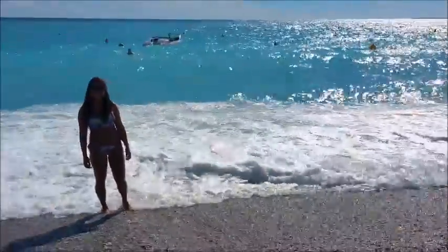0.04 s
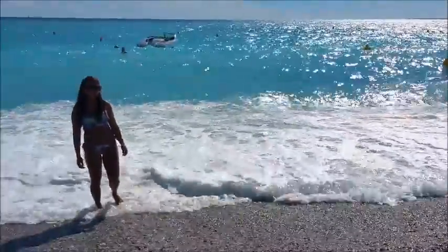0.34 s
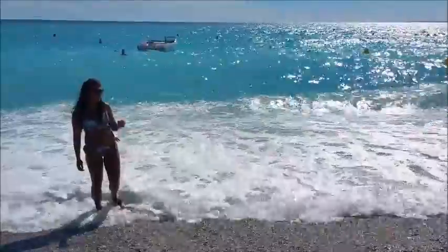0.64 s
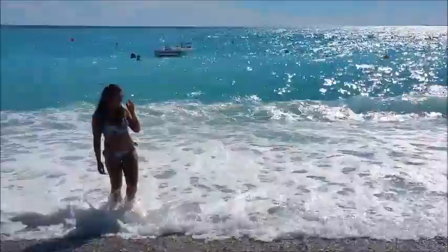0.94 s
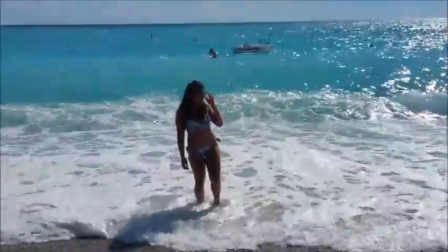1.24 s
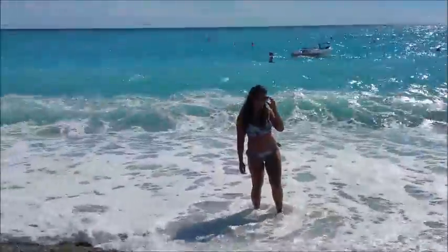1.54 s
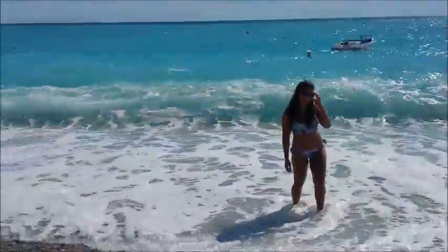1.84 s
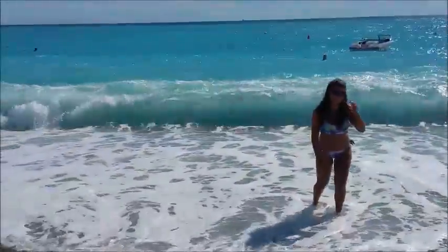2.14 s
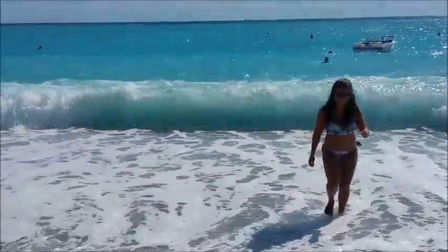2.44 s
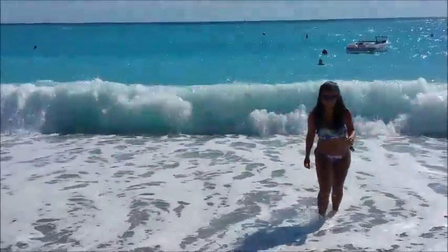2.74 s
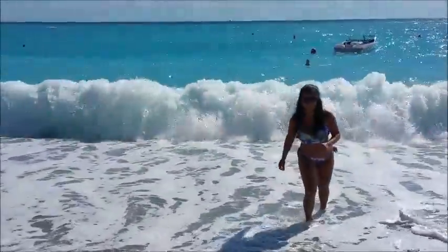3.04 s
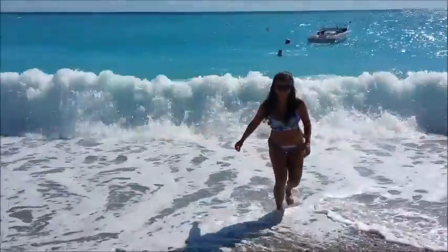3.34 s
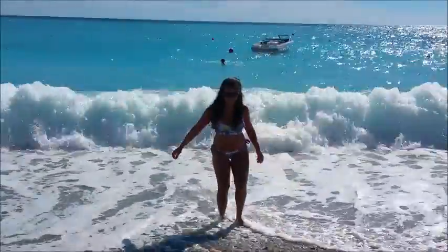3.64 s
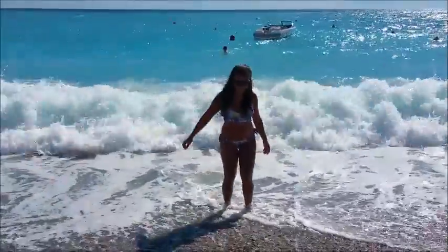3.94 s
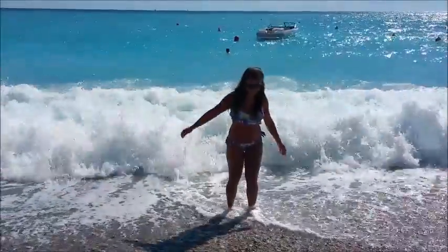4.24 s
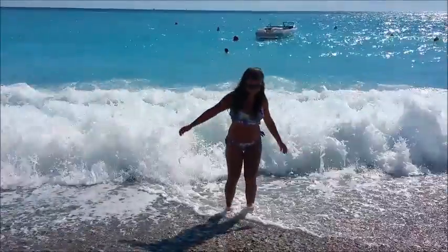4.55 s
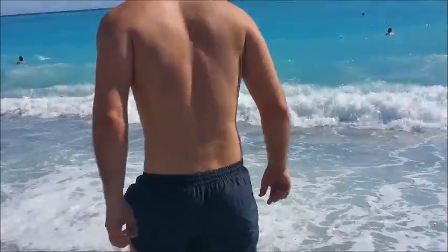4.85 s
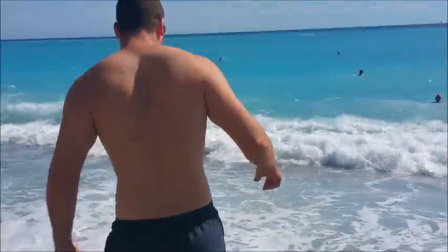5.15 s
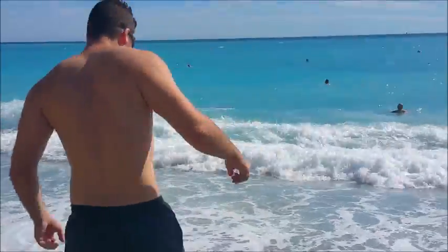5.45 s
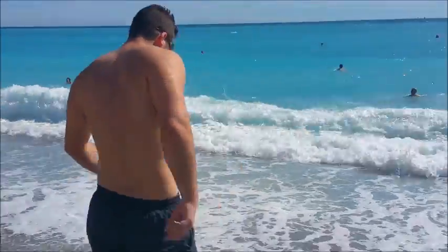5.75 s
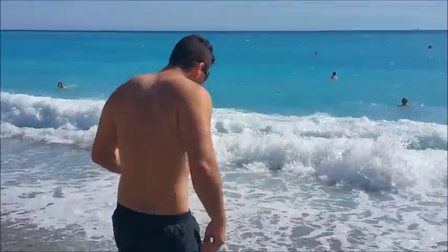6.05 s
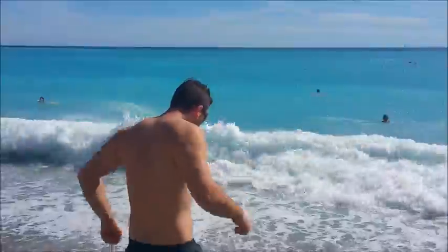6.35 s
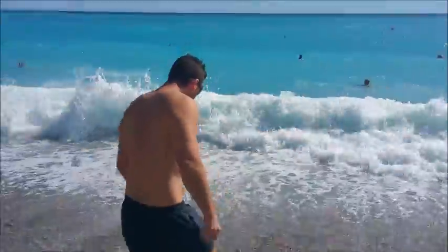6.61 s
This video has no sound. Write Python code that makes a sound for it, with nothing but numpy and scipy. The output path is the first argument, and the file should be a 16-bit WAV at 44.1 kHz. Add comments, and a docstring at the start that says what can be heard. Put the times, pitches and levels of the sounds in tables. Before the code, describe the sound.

Foam seethes up a pebble beach close by, over a light rumble of wind. During the first second, puffs of wind make a low, wavering hoot in the left side of the microphone. Two sharp taps strike the right side, at about 0.1 and 2.3 seconds. From around 2 seconds a breaker builds, crashing near 3 seconds and going on booming and churning under growing splash and fizzing spray. The sound stops dead at 4.6 seconds. After a short silence, more surf fades in at 5 seconds: water slaps the stones and drains through the shingle with a rising hiss, with a few faint, dry pebble clicks. A gust buffets the microphone between 5 and 6 seconds, harder on the right. Farther out, another wave booms at about 5.7 and 6.5 seconds, and the backwash carries on to the end, near 6.8 seconds.

```python
"""Foam washes up a pebble beach, close by, while a breaker builds and collapses behind it.
Wind hoots in the left microphone port and the right one is tapped twice. After a short silence
a second spot fades in: backwash hisses through the shingle while a gust buffets both ports.
The water is the ringing of near bubbles and stones over the noise of countless far ones;
the wind is heard as eddies at the microphone itself."""
import sys
import numpy as np
from scipy import signal
from scipy.fft import rfft, irfft, next_fast_len
from scipy.io import wavfile
from scipy.ndimage import uniform_filter1d, minimum_filter1d, map_coordinates

SR = 44100
rng = np.random.default_rng(int(sys.argv[2]) if len(sys.argv) > 2 else 0)


def store_pcm(level_fs):
    """Save levels as 16-bit WAV."""
    pcm = np.round(np.clip(level_fs, -1, 1) * 32767).astype(np.int16)
    wavfile.write(sys.argv[1], SR, np.atleast_2d(pcm).T)


N = 298998

TOP_HZ = 15870  # band limit
# colour of the ports at the first spot: f/Hz, left minus right/dB
FIRST_LEAN = [(100, 0), (380, 2.5), (560, -2), (800, 0.5), (1080, -2), (1400, 0), (2800, -4), (4100, 6),
              (5000, 5), (7300, 11), (8700, 5.5), (11000, 10), (15000, 17)]
# spectrum of wind on the microphone: f/Hz, level/dB
WIND_COLOUR = [(10, -24.5), (22, -21), (45, -7), (90, -1.5), (140, -3.5), (220, -12.5), (400, -21.5),
               (700, -18.5), (1500, -45), (4000, -80)]


def breaker():
    """Air pockets boom, bubbles churn and the crest crashes; white water splashes and fizzes on top."""
    # course of the wave: t/s, level/dB
    force = [(0.17, -37), (0.56, -38.5), (0.57, -38.5), (1.96, -34.5), (2.33, -30), (2.57, -30.5),
             (2.88, -24), (3.39, -26), (4.01, -22.5), (4.43, -23), (4.55, -23)]  # tumbling water
    fizz = [(0.03, -40), (1.01, -45), (1.72, -45.5), (1.8, -45), (3.04, -34.5), (4.55, -30.5)]  # the white water it leaves
    plunges = [(2.86, -26.5), (3.27, -29)]  # stretches of the crest falling
    hollows = [(1.95, -34), (4.35, -27.5)]  # cavities closing under the crest
    run_up = [(0, -35.5), (.7, -40), (1.4, -38), (2.0, -38), (3.0, -48.5)]  # foam seething near the feet
    # spectra of the layers: f/Hz, level/dB
    boom_colour = [(10, -52.5), (22, -31), (50, -9.5), (100, -5), (160, -4.5), (220, -3.5), (295, 0.8),
                   (360, 1), (430, -3), (520, -14.5), (800, -53.5)]
    churn_colour = [(330, -37), (450, -2.5), (530, -2.5), (620, 0.5), (780, 0.1), (950, -2.5), (1100, -2.5),
                    (1280, -6), (1450, -15.5), (2000, -47.5)]
    crash_colour = [(950, -34), (1200, -2), (1380, 2.5), (1650, 0.2), (1950, -3), (2400, 0), (2800, -1),
                    (3150, -14), (3500, -24), (4500, -61.5)]
    splash_colour = [(2400, -38), (3000, 1), (3300, -1.5), (4100, -5.5), (5000, -6), (5650, -7),
                     (6100, -20.5), (7000, -57)]
    spray_colour = [(4500, -34), (5900, 2), (7000, -0.5), (8500, 0), (10500, -0.5), (13000, -5),
                    (16000, -8)]
    foam_colour = [(500, -47), (820, -2), (980, -0.5), (1300, -1.5), (1550, -15.5), (2400, -45.5)]
    force_db = curves(force)[0] + 22  # both near 0 dB at the height of the wave
    fizz_db = curves(fizz)[0] + 31
    crest = np.hypot(amp(-27 + 0.71 * force_db), swells(plunges, rise_s=0.22, fall_s=0.6))
    pockets = np.hypot(amp(-22 + 1.004 * force_db), swells(hollows, rise_s=0.48, fall_s=0.8))
    boom = pockets * water(
        boom_colour, grains(hz=253, cycles=4.6, spread_db=0.43, count=1500),
        grain_db=-17, patchy_db=0.4, flutter_db=-0.24, flutter_hz=19)
    churn = amp(-21 + force_db) * water(
        churn_colour, grains(hz=807, cycles=5.8, spread_db=1.2, count=4000),
        grain_db=-17.5, patchy_db=0.4, flutter_db=0.52, flutter_hz=36)
    crash = crest * water(
        crash_colour, grains(hz=2040, cycles=3.5, spread_db=4, count=9000),
        grain_db=-14, patchy_db=-0.5, flutter_db=0.14, flutter_hz=22)
    splash = amp(-30 + fizz_db) * water(
        splash_colour, grains(hz=4120, cycles=3.6, spread_db=3.7, count=12000),
        grain_db=-15, patchy_db=-0.3, flutter_db=0.92, flutter_hz=18)
    spray = amp(-38.5 + 0.86 * fizz_db) * water(
        spray_colour, grains(hz=9000, cycles=3.6, spread_db=2.5, count=20000),
        grain_db=-14.5, patchy_db=1.5, flutter_db=0.23, flutter_hz=55)
    foam = amp(curves(run_up)[0]) * water(
        foam_colour, grains(hz=1200, cycles=6.7, spread_db=2.2, count=4000),
        grain_db=-13, patchy_db=-2, flutter_db=-1.2, flutter_hz=11)
    return leaning(boom + churn + crash + splash + spray + foam, FIRST_LEAN)


def backwash():
    """A sheet of water drains ever louder through rattling pebbles; farther out the next wave breaks."""
    # course of the water: t/s, level/dB
    slap_peaks = [(5.28, -27), (6.18, -28.5)]  # the sheet hitting the stones
    collapses = [(5.2, -27), (5.42, -24), (5.7, -22.5), (6.45, -24.5), (6.72, -27)]  # the far wave booming
    churning = [(5.28, -27), (5.716, -26.5), (6.042, -33), (6.454, -24.5), (6.698, -28.5), (6.76, -25.5)]  # the far wave's churn, relative
    # spectra of the layers: f/Hz, level/dB
    slap_colour = [(400, -27), (800, -9), (1350, 1), (1900, -6), (5000, -14), (12000, -28)]
    boom_colour = [(15, -40), (45, -9), (80, -22), (150, -5.5), (260, -1), (320, -1.5), (400, 4),
                   (480, 1.5), (580, -21), (900, -48)]
    churn_colour = [(380, -29), (520, 0), (620, -2.5), (800, 0.5), (1000, 0), (1250, -1.5), (1450, -15),
                    (2000, -55)]
    sheet_colour = [(900, -37), (1280, 0.5), (1600, -1.5), (2100, 0.5), (2700, 0), (3300, -1), (4000, 0),
                    (5500, -4), (6100, -10.5), (7500, -45)]
    shingle_colour = [(4600, -18), (5900, 1.5), (6600, 0.5), (7400, -4), (9000, -7), (10800, -8.5),
                      (13000, -16.5), (16000, -22.5)]
    # colour of the ports at the second spot: f/Hz, left minus right/dB
    second_lean = [(250, -0.5), (460, -2.5), (730, 7), (1050, -1), (2200, 2.5), (3200, -2.5), (5400, -2.5),
                   (6600, -9), (8000, -4.5), (10500, -6.5), (15000, 1)]
    draining_s = np.arange(N) / SR - 6  # from mid-drain; the hiss grows as the stones lie bare
    slaps = swells(slap_peaks, rise_s=0.042, fall_s=0.079) * water(
        slap_colour, grains(hz=1400, cycles=5.4, spread_db=1.4, count=4000),
        grain_db=-13, patchy_db=5.5, flutter_db=0.7, flutter_hz=29)
    boom = swells(collapses, rise_s=0.2, fall_s=0.28) * water(
        boom_colour, grains(hz=250, cycles=4.6, spread_db=3.1, count=1500),
        grain_db=-13, patchy_db=2, flutter_db=-0.1, flutter_hz=16)
    churn = amp(curves(churning)[0] - 1.26) * water(
        churn_colour, grains(hz=745, cycles=4.9, spread_db=1.5, count=4000),
        grain_db=-18.5, patchy_db=1, flutter_db=1.8, flutter_hz=18)
    sheet = amp(-26 + 2.1 * draining_s) * water(
        sheet_colour, grains(hz=3630, cycles=2.4, spread_db=2.1, count=12000),
        grain_db=-14, patchy_db=0.3, flutter_db=0.5, flutter_hz=24)
    shingle = amp(-32 + 4 * draining_s) * water(
        shingle_colour, grains(hz=7900, cycles=4.4, spread_db=2.9, count=12000),
        grain_db=-18.5, patchy_db=1.5, flutter_db=0.57, flutter_hz=97)
    return leaning(boom + churn + slaps + sheet + shingle, second_lean)


def gust():
    """A gust swells and dies, pushing on the ports in lumps; the harder it blows, the more eddies."""
    # peaks of the wind: t/s, level/dB
    gust_peak = [(5.12, -22)]
    buffets = [(5.16, -16.5), (5.47, -15), (5.9, -16), (6.12, -27)]  # lumps on the right, windward port
    # spectrum of the small eddies: f/Hz, level/dB
    eddy_colour = [(70, -20), (140, -6), (200, -6), (280, -5.5), (400, -10.5), (700, -23), (2000, -62)]
    wind = np.hypot(swells(gust_peak, rise_s=1, fall_s=0.75), amp(-32.5))  # over a steady floor
    windward = np.hypot(amp(1.5) * wind, swells(buffets, rise_s=0.04, fall_s=0.066))
    lumps = amp(1.3 * np.array([wobble(16), wobble(29)]))
    rumble = unit(lumps * coloured(rng.standard_normal((2, N)), WIND_COLOUR))
    eddies = unit(lumps * coloured(rng.standard_normal((2, N)), eddy_colour))
    return np.array([wind, windward]) * rumble + amp(-23) * (wind / wind.max()) ** 1.15 * eddies


def hoot():
    """Puffs shed eddies at the left port: an unsteady, sliding low note, rougher in the hard ones."""
    # puffs and their eddy pitch: t/s, f/Hz, level/dB
    puffs = [(.03, 183, -26), (.58, 135.7, -26.5), (.665, 149.7, -19), (.775, 177.7, -19), (.84, 198, -21),
             (.908, 157.5, -16.5), (1.15, 139.8, -41)]
    # f/Hz, level/dB
    rumble_colour = [(30, -25), (130, -4), (300, -3), (500, -13.5), (1200, -31), (4000, -68.5)]
    push = swells([(s, db) for s, hz, db in puffs], rise_s=0.033, fall_s=0.057)
    pitch_hz = curves(puffs)[0] * (1 + 0.092 * wobble(120))
    note = np.sin(2 * np.pi * np.cumsum(pitch_hz) / SR) * amp(2.2 * wobble(80))
    rumble = unit(coloured(rng.standard_normal(N), rumble_colour))
    return np.outer([1, 0], push * unit(note) + amp(-17.5) * (push / push.max()) ** 1.2 * rumble)


def taps():
    """Two sharp knocks right on the microphone set its right port ringing for a few milliseconds."""
    # knocks: t/s, level/dB
    knocks = [(0.1196, -0.5), (2.26, 4.5)]
    # resonances of the port: f/Hz, relative level/dB, t60/s
    modes = [(496, 0.5, 0.008), (970, 2, 0.0043), (1830, 1, 0.0021)]
    right, t = np.zeros(N), np.arange(SR // 20) / SR
    ring = sum((-1) ** k * amp(db - 60 * t / t60) * np.sin(2 * np.pi * hz * t)
               for k, (hz, db, t60) in enumerate(modes))
    for s, db in knocks:
        right[round(s * SR):][:len(t)] += amp(db) * ring / np.abs(ring).max()
    return np.outer([0, 1], right)


def shoreline():
    """Close by, a small wave spills over the stones; later the breaker throws fine droplets on them."""
    # peaks of the spill and the droplets: t/s, level/dB
    swash_peak = [(0.2, -39.5)]
    droplet_peak = [(4.58, -43)]
    # their spectra: f/Hz, level/dB
    swash_colour = [(1200, -18.5), (2000, -1.5), (2650, -2), (3300, -18.5), (6500, -15), (9000, -13),
                    (15000, -25.5)]
    droplet_colour = [(6000, -29.5), (10000, -5), (12500, 0), (16000, -2.5)]
    swash = swells(swash_peak, rise_s=0.47, fall_s=0.91) * water(
        swash_colour, grains(hz=2602, cycles=4.6, spread_db=2.2, count=6000),
        grain_db=-9, patchy_db=4.5, flutter_db=1.5, flutter_hz=18)
    droplets = swells(droplet_peak, rise_s=1.05, fall_s=0.5) * water(
        droplet_colour, grains(hz=11000, cycles=3.6, spread_db=2.5, count=12000),
        grain_db=-12.5, patchy_db=-1, flutter_db=1.5, flutter_hz=25)
    return leaning(swash + droplets, FIRST_LEAN)


def pebbles():
    """A few stones near the microphone knock together, bright and dry."""
    # single knocks: t/s, level/dB
    clicks = [(5.247, -31), (5.4256, -34), (5.7373, -33), (6.6894, -32)]
    bright = coloured(rng.standard_normal((2, N)), [(5000, -25), (12000, 0), (16000, -3)])
    return swells(clicks, rise_s=0.002, fall_s=0.006) * unit(bright)


def breeze():
    """A light, steady wind keeps a low rumble on both ports."""
    rumble = coloured(rng.standard_normal((2, N)) + rng.standard_normal(N), WIND_COLOUR)
    return amp(-41 + 1.3 * wobble(3.9)) * unit(rumble)


def water(colour, near_grains, grain_db, patchy_db, flutter_db, flutter_hz):
    """Near grains over the blur of countless far ones, surging, coloured and spread between the ports."""
    # likeness of the surf at the two ports: f/Hz, correlation
    likeness = [(60, 0.98), (300, 0.99), (480, 0.62), (750, 0.52), (900, 0.37), (1100, 0.02), (1400, -0.15),
                (2500, -0.05), (15000, 0.0048)]

    def response(hz):
        width = np.arccos(np.clip(along(likeness, hz), -1, 1)) / 2
        return amp(along(colour, hz)) * [np.cos(width), np.sin(width)]
    blend = patchy(patchy_db) + amp(grain_db) * near_grains
    mid, side = filtered(blend * amp(flutter_db * wobble(flutter_hz)), response)
    return np.array([mid + side, mid - side]) / np.std(mid)


def grains(hz, cycles, spread_db, count):
    """Bubbles or stone contacts: damped rings of scattered pitch, size and bearing, as mid and side."""
    start, octave = rng.random(count), rng.normal(0, 0.44, count)
    size, bearing = rng.exponential(1, count), rng.uniform(-1.02, 1, count) * np.pi / 2
    age = np.arange(int(np.clip(2 * cycles * SR / hz, 8, 900)))
    turns = np.minimum(hz * 2 ** octave, TOP_HZ)[:, None] * age / SR
    strength = amp(spread_db * np.minimum(size, 5))[:, None]
    rings = strength * np.sin(2 * np.pi * turns) * np.exp(-2 * turns / cycles)
    at = ((start * N).astype(int)[:, None] + age).ravel()
    return unit(np.array([np.bincount(at, (rings * pan[:, None]).ravel(), N)[:N]
                          for pan in (np.cos(bearing), np.sin(bearing))]))


def patchy(depth_db):
    """Two noises whose gain varies in patches of time and frequency."""
    spectra = signal.stft(rng.standard_normal((2, N)), nperseg=512)[2]
    patches = uniform_filter1d(rng.standard_normal(spectra.shape), size=7, axis=1)
    patches = unit(uniform_filter1d(patches, size=12, axis=2))
    return unit(signal.istft(spectra * amp(depth_db * patches), nperseg=512)[1][:, :N])


def leaning(x, balance):
    """Each port colours the sound in its own way; the summed power stays."""
    def gains(hz):
        sides = amp(np.outer([1, -1], along(balance, hz)) / 2)
        return sides / np.sqrt(np.mean(sides ** 2, axis=0))
    return filtered(x, gains)


def swells(events, rise_s, fall_s):
    """Gain of (t/s, level/dB) surges that rise smoothly to a peak and die away; their powers add."""
    t = np.arange(N) / SR
    shape = lambda u: np.exp(-(np.minimum(u, 0) / rise_s) ** 2 - np.maximum(u, 0) / fall_s)
    return np.sqrt(sum((amp(db) * shape(t - s)) ** 2 for s, db in events))


def curves(rows):
    """One value per sample for each column after the time."""
    times, *columns = np.transpose(rows)
    return [np.interp(np.arange(N) / SR, times, column) for column in columns]


def wobble(rate):
    """A smooth random curve, rate knots a second."""
    return map_coordinates(rng.standard_normal(int(N * rate / SR) + 4), [np.arange(N) * rate / SR])


def coloured(x, colour):
    """Filter x by (f/Hz, level/dB) points."""
    return filtered(x, lambda hz: amp(along(colour, hz)))


def filtered(x, response):
    """Filter x by a gain given as a function of frequency."""
    size = next_fast_len(N + SR // 2)
    return irfft(rfft(x, size) * response(np.fft.rfftfreq(size, 1 / SR)), size)[..., :N]


def along(points, hz):
    """(f/Hz, value) points read on a log axis."""
    freqs, values = np.transpose(points)
    return np.interp(np.log(hz + 1), np.log(freqs + 1), values)


def amp(db):
    """Decibels to gain."""
    return 10 ** (np.asarray(db) / 20)


def unit(x):
    """Scale to rms 1."""
    return x / np.sqrt(np.mean(x ** 2) + 1e-20)


def scene():
    """The first spot on the beach stops dead; after a silence the second fades in."""
    first_end_s, second_start_s, fade_s = 4.588, 4.98, 0.31
    t = np.arange(N) / SR
    stop = amp(np.interp(t - first_end_s, [0, .003, .012, .028, .045], [0, -20, -34, -39, -120]))
    fade_in = np.clip((t - second_start_s) / fade_s, 0, 1) ** 0.8
    first_spot = breaker() + shoreline() + breeze() + hoot() + taps()
    second_spot = backwash() + pebbles() + gust()
    return stop * first_spot + fade_in * second_spot


def record(dry):
    """A quick limiter ducks both channels under the sharpest peaks; the top is cut at the band limit."""
    needed = np.minimum(1, 0.9 / (np.abs(dry).max(axis=0) + 1e-9))
    held = minimum_filter1d(needed, size=600, origin=200)
    gain = uniform_filter1d(held, size=100)
    return filtered(dry * gain, lambda hz: np.clip((TOP_HZ - hz) / 100 + 0.5, 0, 1))


dry = scene()
out = record(dry)
store_pcm(out)
```